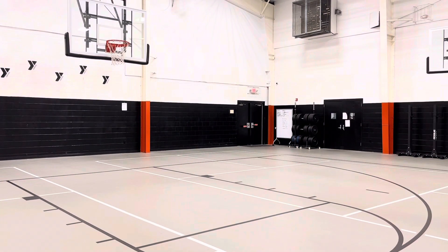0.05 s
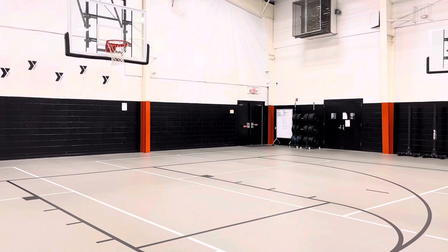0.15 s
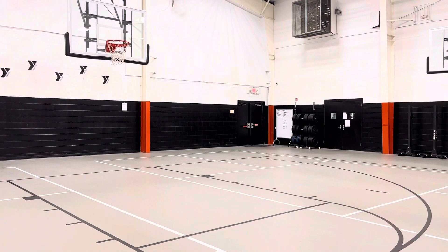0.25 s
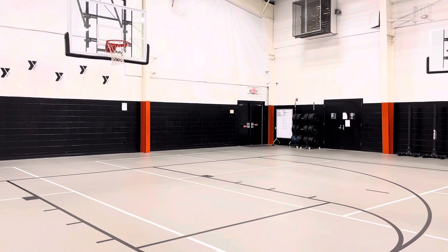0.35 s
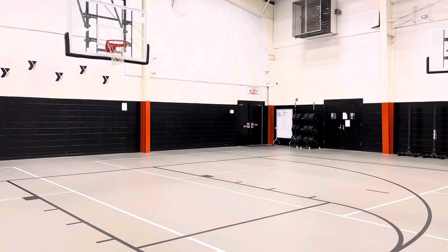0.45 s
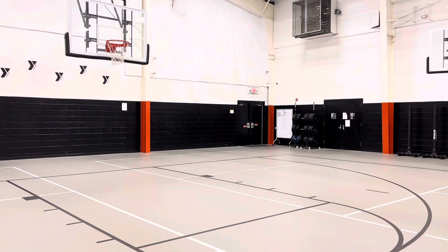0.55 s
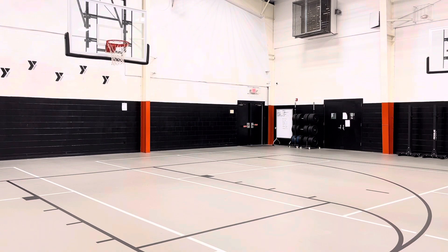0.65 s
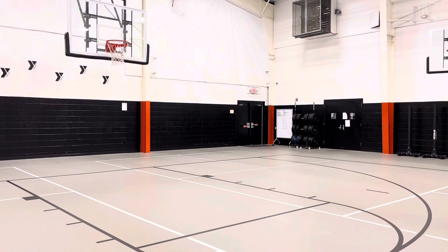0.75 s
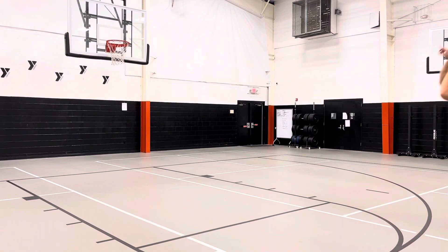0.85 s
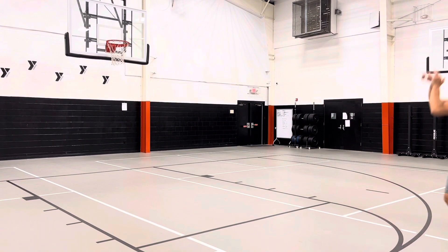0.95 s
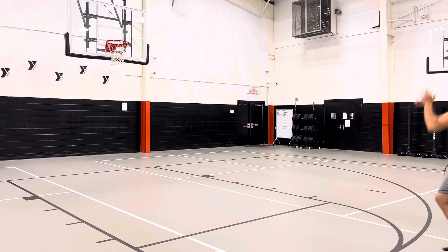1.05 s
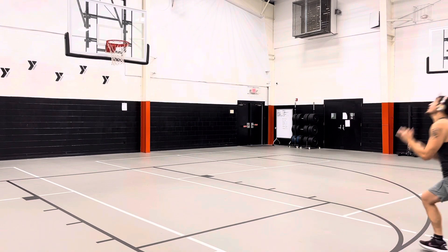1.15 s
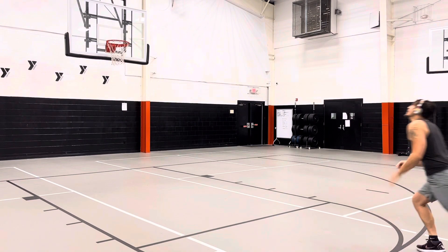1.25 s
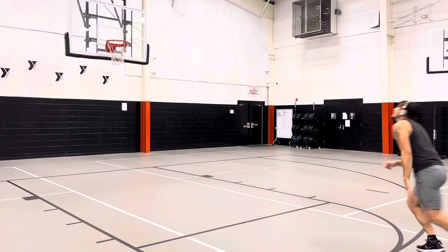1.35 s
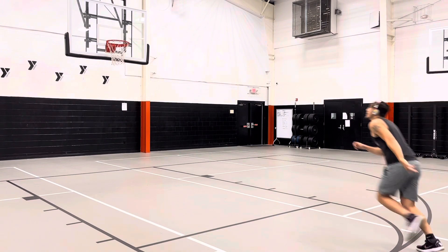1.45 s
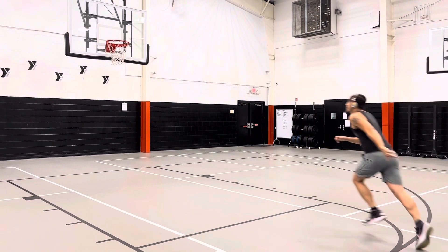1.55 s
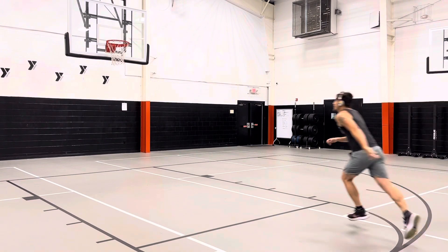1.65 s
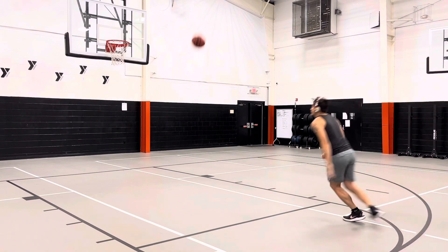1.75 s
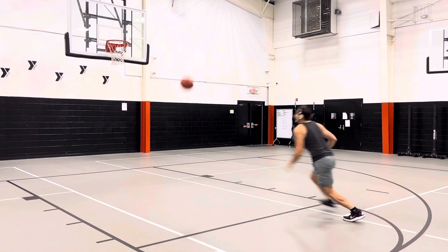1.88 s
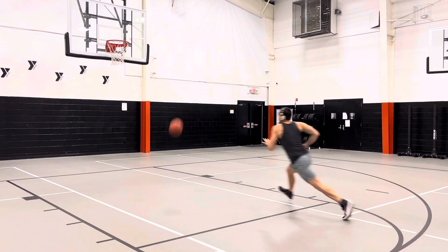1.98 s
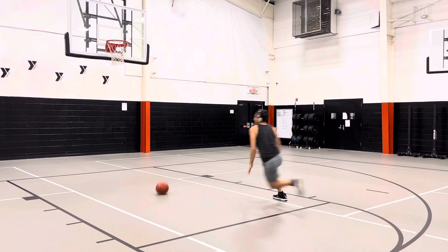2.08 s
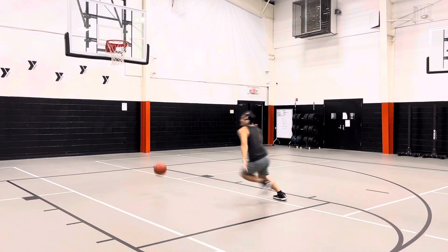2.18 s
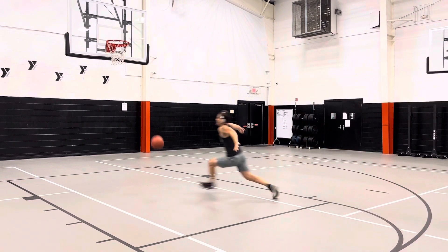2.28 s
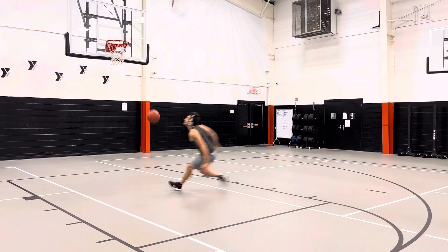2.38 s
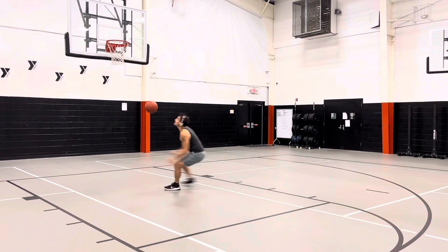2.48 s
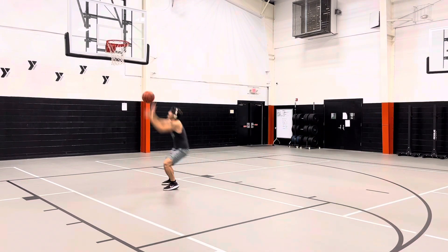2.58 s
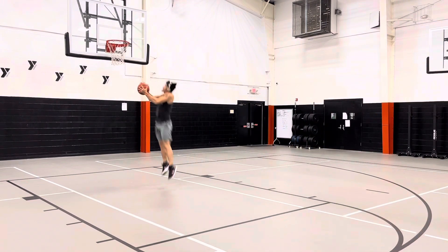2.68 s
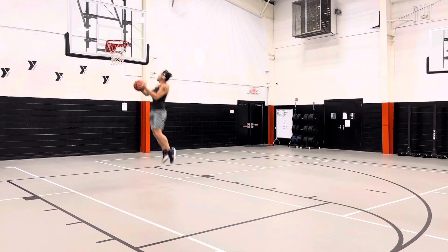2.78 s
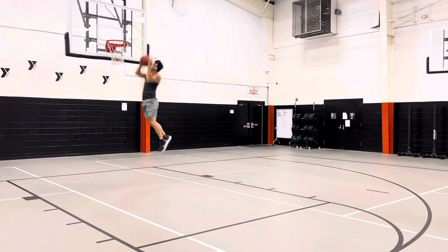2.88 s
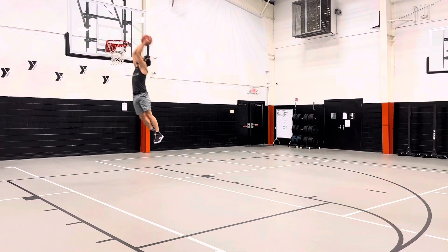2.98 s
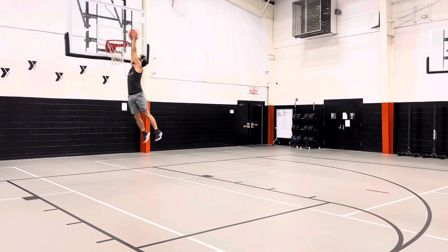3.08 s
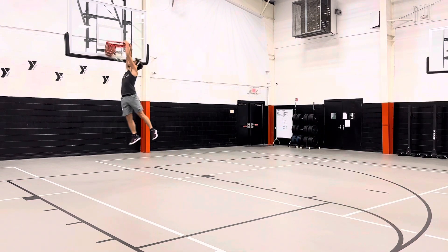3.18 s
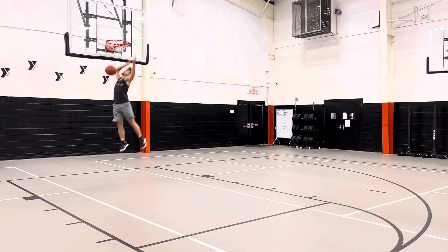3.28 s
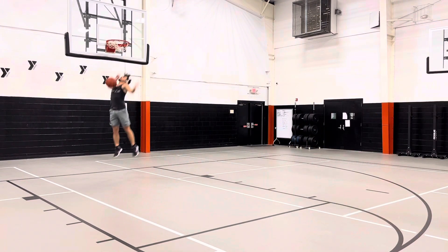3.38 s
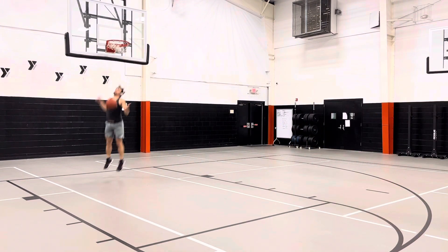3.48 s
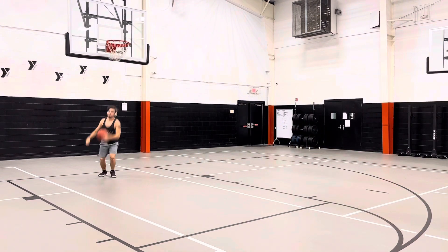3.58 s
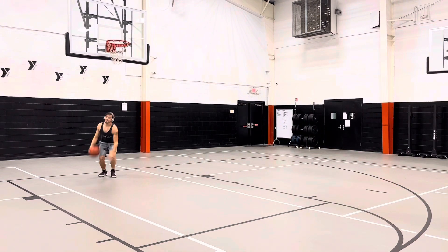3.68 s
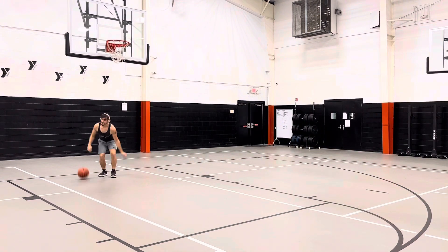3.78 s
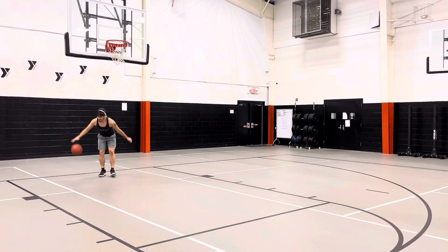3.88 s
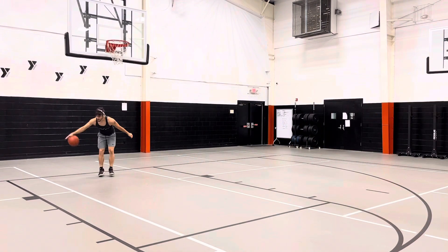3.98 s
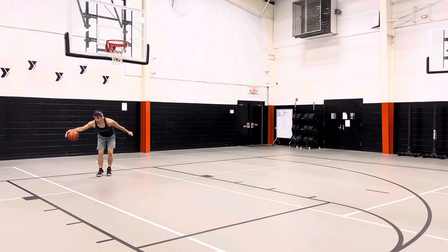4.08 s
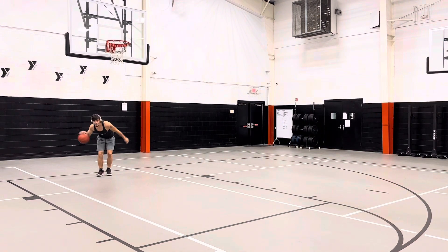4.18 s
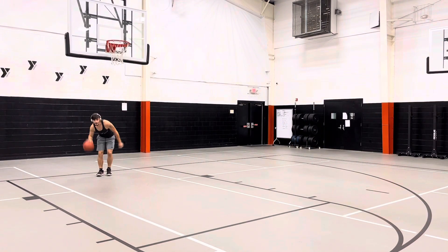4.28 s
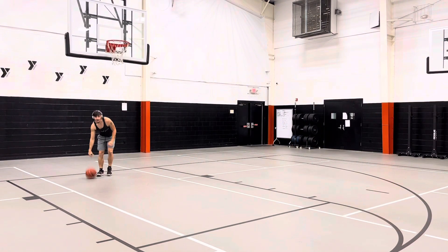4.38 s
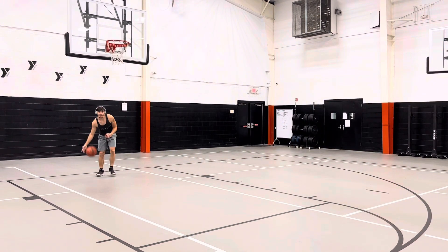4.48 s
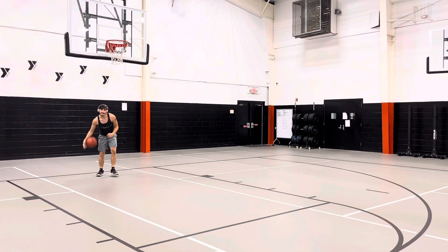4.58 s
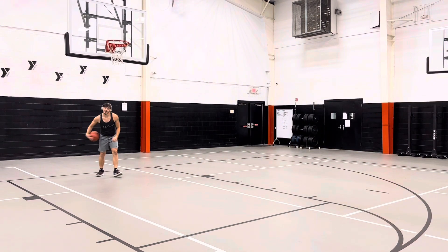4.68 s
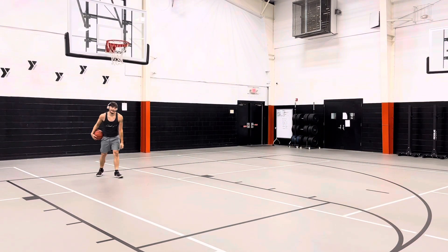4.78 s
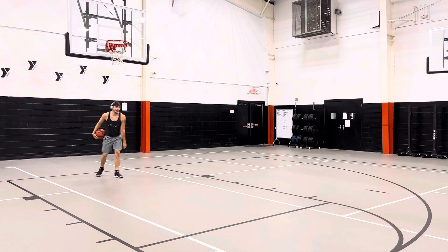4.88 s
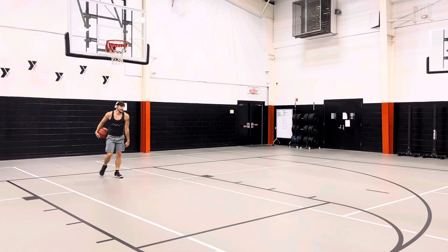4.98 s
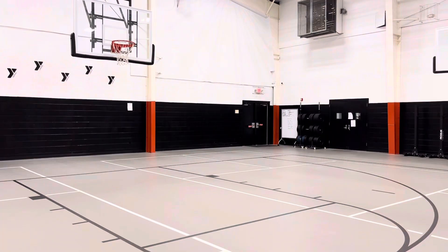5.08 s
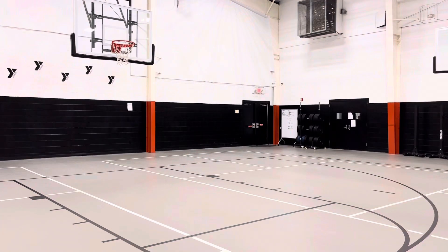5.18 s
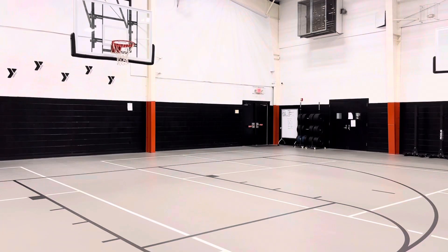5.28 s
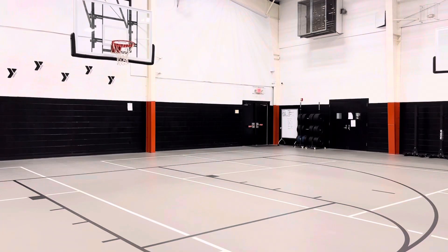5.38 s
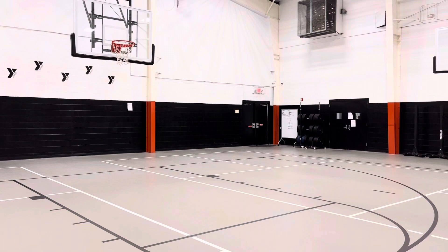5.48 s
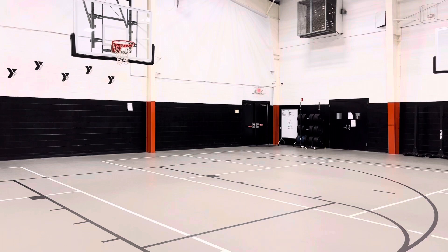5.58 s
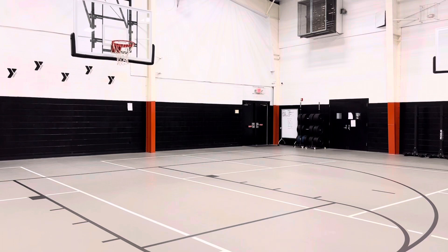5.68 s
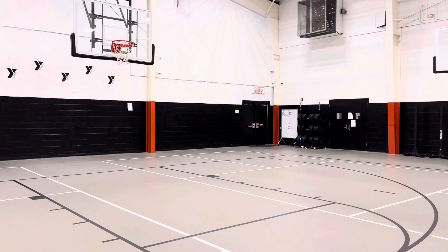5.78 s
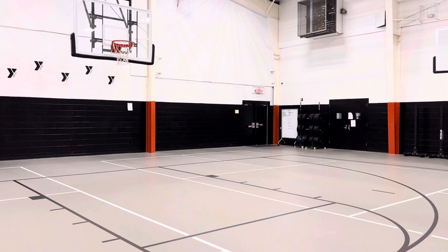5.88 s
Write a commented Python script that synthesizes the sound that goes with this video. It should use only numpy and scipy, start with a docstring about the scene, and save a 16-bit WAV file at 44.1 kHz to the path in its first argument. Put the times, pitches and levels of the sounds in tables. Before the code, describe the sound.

A large, hard-walled gym heard from a fixed stereo microphone. Low ventilation rumble and thin air run throughout; at first the ring of an earlier bounce is dying away. Soft running footfalls come at about 0.05, 0.64, 1.0, 1.3, 1.75 and 2.05 seconds, some toward the left. At 2.14 a basketball hits the floor very loudly: sharp slap, hollow ringing shell, deep falling thump, quick fluttering echoes and a long bright reverberation. Around 2.55-2.62 a high shoe squeak chirps twice. From 3.17 to 3.35 a dunk gives a dull hoop thud, then clacks and loose metallic rattling. Feet land with a heavy double thump at 3.55. Softer dribbles sound at 3.80 and 4.42, with a tiny rubber chirp at 4.1. At 5.04 the echo stops abruptly, leaving quiet rumble, barely audible swishes, and a fresh footstep at 5.83.

```python
"""Empty gym: a player runs in, lets the ball bounce, jumps and dunks, lands, dribbles twice and steps on.
Ball, shoes, hoop and backboard are struck ringing modes; the floor gives falling thumps, the soles
stick-slip squeaks. Blows ring on through decaying noise bands, until the ringing stops short.
Ventilation rumble, air, faint swishes and the fading ring of an earlier bounce are shaped noise."""
import sys
import numpy as np
from scipy import signal
from scipy.io import wavfile

SR = 44100
rng = np.random.default_rng(int(sys.argv[2]) if len(sys.argv) > 2 else 0)


def store_pcm(level_fs):
    """Save levels as 16-bit WAV."""
    pcm = np.round(np.clip(level_fs, -1, 1) * 32767).astype(np.int16)
    wavfile.write(sys.argv[1], SR, np.atleast_2d(pcm).T)


N = 262262


def amp(db):
    """dB to gain."""
    return 10 ** (np.asarray(db) / 20)


def rms_one(x):
    """Scale to rms 1."""
    return x / np.sqrt(np.mean(x ** 2) + 1e-20)


def cut(x, order, edge_hz, kind="low"):
    """Butterworth filter along time."""
    return signal.sosfilt(signal.butter(order, edge_hz, kind, fs=SR, output="sos"), x)


def at_hz(points, hz):
    """Read a spectrum table on a log-frequency axis."""
    table_hz, table_value = np.transpose(points)
    return np.interp(np.log(hz), np.log(table_hz), table_value)


def drift(rate_hz, size):
    """Slow random wander of spread 1: noise through a two-pole lowpass, computed every 40 samples."""
    r = np.exp(-80 * np.pi * rate_hz / SR)
    noise = rng.standard_normal(size // 40 + 2002)
    slow = signal.lfilter([1], [1, -2 * r, r * r], noise)[2000:]  # settled part
    return np.interp(np.arange(size) / 40, np.arange(len(slow)), rms_one(slow))


def ring(clicks, hz, t60_s):
    """Damped resonator: a unit click sets a sine of height 1 ringing."""
    r, w = amp(-60 / (t60_s * SR)), 2 * np.pi * hz / SR
    return signal.lfilter([0, np.sin(w)], [1, -2 * r * np.cos(w), r * r], clicks + 1e-18)


def left_right(mid, side):
    """Mid and side to two channels."""
    return np.array([mid + side, mid - side])


PAN_TOP_HZ = 7500  # level panning fades out above


def add(track, sound, start_s, lead=0., pan_db=0.):
    """Mix in a short sound; lead (samples) and pan_db (L-R) set its side by arrival time and level."""
    k, i = np.arange(len(sound)), int(start_s * SR)
    lowpass = signal.butter(2, PAN_TOP_HZ, fs=SR)
    for channel, sign in enumerate([1, -1]):
        late = np.interp(k - max(-sign * lead, 0), k, sound, left=0)
        panned = (amp(sign * pan_db / 2) - 1) * signal.lfilter(*lowpass, late)
        track[channel, i:i + len(k)] += (late + panned)[:N - i]


# side minus mid of diffuse sound: hz, side_re_mid_db
WIDTH = [(60, -34), (110, -18), (200, -10), (380, -3.5), (700, 2), (1290, 3.5), (2380, -5), (4400, -1.5),
         (8120, 0.5), (15000, -3)]
# left port hears more of the presence range: hz, left_re_right_db
LEAN = [(60, -1), (180, -1), (550, 1), (1650, -0.5), (4970, 6.5), (15000, -4.5)]
DIFFUSE_TOP_HZ, SIDE_TOP_HZ = 14200, 10500


def diffuse_bands(size, gain_at):
    """Far sound: half-octave bands of mid and side noise, each under gain_at(hz), with their top cut."""
    out, edges_hz = 0, 25 * 2 ** np.arange(0, 9.6, .5)
    white = cut(rng.standard_normal((2, 2, size)), 8, DIFFUSE_TOP_HZ)
    white[:, 1] = cut(white[:, 1], 6, SIDE_TOP_HZ)
    for k, (low_hz, high_hz) in enumerate(zip(edges_hz, edges_hz[1:])):
        mid, side = cut(white[k % 2], 2, [low_hz, high_hz], "band")  # neighbours use different noise
        hz = np.sqrt(low_hz * high_hz)
        lean = amp(at_hz(LEAN, hz) / 2 * np.array([[1], [-1]]))
        out = out + gain_at(hz) * lean * left_right(mid, side * amp(at_hz(WIDTH, hz)))
    return out


# ventilation spectrum, shape only: hz, relative_db_per_hz
RUMBLE = [(15, -59), (25, -63), (41, -18.5),(64, 4), (112, -11.5), (139, -14), (246, -21.5), (400, -30.5),
          (520, -63), (880, -93)]
# low rumble level, at first with the dying bass of an earlier bounce: time_s, level_db
RUMBLE_LEVEL = [(0, -33), (.9, -39.5), (1.05, -35.5), (2.1, -39.5), (5.5, -36.5), (5.95, -40.5)]
# air spectrum, shape only: hz, relative_db_per_hz
AIR = [(120, -9), (200, -4.5), (326, -6.5), (946, -10.5), (5170, -22), (7280, -78), (8410, -65),
       (9380, -35), (12700, -33), (15000, -94)]
AIR_DB, EARLIER_RING_DB, EARLIER_RING_T60_S = -54, -47.5, 3.7
EARLIER_RING_HZ, EARLIER_RING_WIDTH_HZ, EARLIER_PEAK_DB = 1030, 350, 2.5  # colour of the ball's shell


def room_tone():
    """Low rumble, at first fading with an earlier bounce, a steady wash of air, and that bounce's ring."""
    t = np.arange(N) / SR
    rumble = rms_one(diffuse_bands(N, lambda hz: amp(at_hz(RUMBLE, hz))))
    rumble = rumble * amp(0.5 * drift(0.69, N))
    rumble = rumble * amp(np.interp(t, *np.transpose(RUMBLE_LEVEL)))
    air = rms_one(diffuse_bands(N, lambda hz: amp(at_hz(AIR, hz))))
    reversed_air = air[:, ::-1]  # same spectrum, other waveform
    peak = signal.iirpeak(EARLIER_RING_HZ, EARLIER_RING_HZ / EARLIER_RING_WIDTH_HZ, SR)
    earlier = reversed_air + amp(EARLIER_PEAK_DB) * signal.lfilter(*peak, reversed_air)
    earlier = earlier * amp(EARLIER_RING_DB - 60 * t / EARLIER_RING_T60_S)
    return rumble + air * amp(AIR_DB) + earlier


# clothes and soles in the highest treble: start_s, length_s, relative_db
SWISHES = [(0.022, 0.087, -74.5), (1.26, 0.03, -78), (1.998, 0.023, -72.5), (5.313, 0.046, -79),
           (5.585, 0.041, -83)]


def swishes():
    """Soft swells of thin noise, quick to rise and slower to fade."""
    t, swell = np.arange(N) / SR, np.zeros(N)
    for start_s, length_s, relative_db in SWISHES:
        u = np.clip((t - start_s) / length_s, 0, None)
        swell += amp(relative_db) * 9.3 * u * np.exp(1 - 2.35 * u)
    return swell * rms_one(cut(rng.standard_normal(N), 4, [9500, 14000], "band"))


def tick(centre_hz, t60_s=.0045, front=4):
    """Decaying noise burst around one pitch; peak 1."""
    t = np.arange(int(1.5 * t60_s * SR)) / SR
    burst = rng.standard_normal(len(t)) * amp(-60 * t / t60_s)
    burst[0] = front  # first sample set, not random
    burst = cut(burst, 2, [centre_hz / 1.7, centre_hz * 1.7], "band")
    return burst / np.abs(burst).max()


def thump(low_hz=56, sweep=0.715, rise_s=0.0082, t60_s=0.15):
    """Bending waves in the floor: high pitches run ahead, so the tone falls towards low_hz."""
    t = np.arange(8000) / SR
    phase = 2 * np.pi * (low_hz * t + sweep * np.log(1 + t / .003))
    return np.sin(phase) * (1 - np.exp(-(t / rise_s) ** 2)) * amp(-60 * t / t60_s)


# shoes on the floor: start_s, tap_db, knock_db, knock_hz, thump_db, left_re_right_db
STEPS = [(.052, -35, -30.5, 544, -25.5, -3), (0.637, -45, -39, 390, -58, 8),
         (.645, -35.5, -32.5, 376, -26, 2), (1.022, -42, -36, 300, -31.5, 4),
         (1.2650, -30, -37.5, 850, -60, 9.5), (1.7440, -49, -33, 905, -25.5, -2),
         (2.05, -48, -34, 507, -29, -1), (3.544, -36, -41, 400, -14.5, 1),
         (3.575, -21.5, -21, 200.5, -21, 1), (5.8320, -28, -25, 334, -23.5, 5.5),
         (5.85, -30.5, -35, 520, -45, 8)]
# sole: multiple_of_knock_hz, re_knock_db, t60_s
SOLE_MODES = [(.5, 0, 0.0089), (1, -3, 0.02), (1.5, -0.5, 0.0032)]
TAP_HZ, STEP_SEND_DB = 3500, 1.5


def steps():
    """Tread tap, sole knock and short floor thump; returns the direct sound and the hall feed."""
    direct, feed = np.zeros((2, N)), np.zeros((2, N))
    for start_s, tap_db, knock_db, knock_hz, thump_db, pan_db in STEPS:
        sound = amp(thump_db) * thump(low_hz=66.3, sweep=1.0, rise_s=0.0044, t60_s=0.072)
        click = np.arange(len(sound)) == 70
        for multiple, db, t60_s in SOLE_MODES:
            sound += amp(knock_db + db) * ring(click, knock_hz * multiple, t60_s)
        tap = amp(tap_db) * tick(TAP_HZ, .004, 6)
        sound[:len(tap)] += tap
        add(direct, sound, start_s, 0., pan_db)
        add(feed, amp(STEP_SEND_DB) * sound, start_s)
    return direct, feed[0]


# late decay: hz, t60_s
HALL_T60 = [(40, 1.15), (120, 4.6), (350, 3.56), (900, 2.55), (2400, 2.68), (5000, 3.14), (7500, 1.7),
            (10600, 1.33), (13000, 0.71)]
# reverberation spectrum: hz, relative_db
HALL_COLOUR = [(30, 6.5), (80, -7.5), (200, -4), (500, -6.5), (1200, -8), (2500, -0.5), (5000, -2),
               (9000, 2), (14000, -14.5)]


def hall(feed, level_db=-36, early_db=21.0, early_t60_s=0.15):
    """Reverberation: reflections thicken, an early boost dies fast, each band decays at its own rate."""
    t = np.arange(3 * SR) / SR
    tail = diffuse_bands(len(t), lambda hz: amp(at_hz(HALL_COLOUR, hz) - 60 * t / at_hz(HALL_T60, hz)))
    tail *= 1 - np.exp(-(t / .052) ** 2)
    tail *= 1 + amp(early_db - 60 * t / early_t60_s)
    return amp(level_db) * signal.fftconvolve(feed[None], tail, axes=1)[:, :N]


# air squeezed out at contact: hz, relative_db, t60_s
SLAP_MODES = [(2100, 1, .002), (3400, -2, .001), (5500, -4, .001), (11000, -3, .0008)]


def slap(thin_hz=700, dull_hz=15000):
    """Millisecond puff of air squeezed out at contact: a spike rings short modes; peak 1."""
    spike = np.zeros(600)
    spike[:5] = [-1, 0, 0, 0, 0] + .15 * rng.standard_normal(5)
    burst = sum(amp(db) * ring(spike, hz, t60_s) for hz, db, t60_s in SLAP_MODES)
    burst = cut(burst, 2, [thin_hz, dull_hz], "band")
    return burst / np.abs(burst).max()


# ball on the floor: start_s, slap_db, shell_db, thump_db, thump_send_db, left_lead_samples,
# left_re_right_db, echoes_db, end_wall_delay_s, first_flutter_db, loss_per_flutter_db, slap_send_db
BOUNCES = [(2.1440, 2, -14.5, -1.5, 4, 2.64, 0.82, -6.5, .0420, 1, 9, 3.5),
           (3.8036, -9.5, -19, -9.5, 1, 3.7, 5.7, -15.5, .0284, -4, 4, 5.5),
           (4.4220, -13, -19, -6.5, 2, 3.0, 2.6, -17, .0280, -2, 1.5, 8.5)]
# ball shell: hz, relative_db, t60_s
BALL_MODES = [(233.4, 6, 0.011), (382, -0.5, 0.031), (482, -10.5, 0.0055), (732, -22, 0.07),
              (918, 3.5, 0.02), (1005, -6, 0.077), (1091, -15.5, 0.11), (827, -13, 0.042)]
# returns common to all bounces: delay_s, re_echoes_db, centre_hz
ECHOES = [(.0180, -3, 4500), (.048, -8, 4500), (.061, -8, 3000), (.090, -6, 4500)]
END_WALL_DB, END_WALL_HZ = 0, 5000  # its delay depends on where the ball lands
SHELL_SEND_DB = 9.5
SHELL_LAG_CYCLES = 0.732  # onset of each mode in its own cycles: lows come later
THUMP_LAG_S = .002
CRACKLE_DB, CRACKLE_HZ = -12, 6500  # pebbled skin at contact
FLUTTER_S, FLUTTER_ODD_DB = .0142, 1.5  # spacing of the shell's returns, spread of their levels


def bounce(row, odd_db):
    """Slap, ringing shell, late floor thump, echoes, and a freshly drawn reverberation tail."""
    (start_s, slap_db, shell_db, thump_db, thump_send_db, lead, pan_db,
     echo_db, wall_s, flutter_db, loss_db, slap_send_db) = row
    low = np.pad(thump(), (int(THUMP_LAG_S * SR), 0))
    k, shell = np.arange(len(low)), 0
    for (hz, db, t60_s), mode_odd_db in zip(BALL_MODES, odd_db):
        click = k == int(SHELL_LAG_CYCLES * SR / hz)
        shell = shell + amp(db + mode_odd_db) * ring(click, hz, t60_s)
    puff = np.pad(slap(), (0, len(low) - 600))
    parts = np.array([puff, shell, low]) * amp([slap_db, shell_db, thump_db])[:, None]

    direct, feed = np.zeros((2, N)), np.zeros((2, N))
    add(direct, parts.sum(0), start_s, lead, pan_db)
    add(direct, amp(CRACKLE_DB) * tick(CRACKLE_HZ), start_s, lead, pan_db)
    for delay_s, db, centre_hz in list(ECHOES) + [(wall_s, END_WALL_DB, END_WALL_HZ)]:
        echo_lead = rng.uniform(-1.5, 1.5)
        add(direct, amp(echo_db + db) * tick(centre_hz), start_s + delay_s, echo_lead, pan_db / 2)
    for turn, (odd_level, odd_lead) in enumerate(rng.normal(0, 1, (6, 2))):
        gain = amp(flutter_db - loss_db * turn + FLUTTER_ODD_DB * odd_level)
        add(direct, gain * parts[1], start_s + FLUTTER_S * (turn + 1), odd_lead, pan_db / 2)
    add(feed, amp([slap_send_db, SHELL_SEND_DB, thump_send_db]) @ parts, start_s)
    return direct + hall(feed[0])


# slipping sole: start_s, length_s, pitch_hz, end_db, swell_db, sag_share, second_db, third_db,
# left_re_right_db, sharp_start_share, wobble_share
SQUEAKS = [(2.556, .048, 5320, -34, 16, .01, 6, -40, -2.0, 0, .013),
           (2.609, .012, 5310, -25.5, 6, .015, 6, -40, -2.0, .03, .009),
           (4.0965, .002, 4550, -41, -5, .03, -10, -8, 8.0, .03, .015),
           (4.0993, .005, 4000, -32, -7, .11, 0, 3, 8.0, .01, .01),
           (4.110, .019, 4040, -27.5, 6, .085, -10, -2, 8.0, 0, .017)]
GRIP_S, LET_GO_S = .002, .008  # sharp start settles; sole lets go
LET_GO_DB, LET_GO_THIRD_DB = 5, 14  # fade while letting go; top overtone goes first


def squeaks(rough_db=3.5):
    """Stick-slip of rubber: a wavering tone with two overtones."""
    out = np.zeros((2, N))
    for (start_s, length_s, hz, end_db, swell_db, sag, second_db, third_db,
         pan_db, sharp, wobble) in SQUEAKS:
        t = np.arange(0, length_s + LET_GO_S, 1 / SR)
        letting_go = np.clip((t - length_s) / LET_GO_S, 0, 1)
        bend = 1 + sharp * np.exp(-t / GRIP_S) - sag * np.minimum(2 * letting_go, 1)
        bend += wobble * drift(350, len(t))
        phase = 2 * np.pi * np.cumsum(hz * bend) / SR
        tone = np.sin(phase) + amp(second_db) * np.sin(2 * phase)
        tone += amp(third_db - LET_GO_THIRD_DB * np.sqrt(letting_go)) * np.sin(3 * phase)
        level_db = end_db - swell_db * np.clip(1 - t / length_s, 0, 1) - LET_GO_DB * letting_go ** 2
        level_db = level_db + rough_db * drift(320, len(t))
        add(out, tone * np.minimum(t / GRIP_S, 1) * amp(level_db), start_s, 2.0, pan_db)
    return out


# blows of the dunk: start_s, relative_db, hardness_hz, clack_db
HOOP_BLOWS = [(3.172, -23, 151, -60), (3.185, -33, 900, -35), (3.205, -27, 405, -45),
              (3.269, -34, 2600, -18.5), (3.289, -32.5, 2580, -24.5), (3.310, -30.5, 2080, -46),
              (3.338, -28.5, 1800, -40)]
RATTLE_DB, RATTLE_T60_S, RATTLE_HARD_HZ = -11, 0.24, 1874  # hardness of unit gain


def rattle_level(t):
    """Gain of the loose shaking: dying remains of all blows so far, more from hard ones."""
    start_s, db, hardness_hz, _ = np.transpose(HOOP_BLOWS)[:, :, None]
    decay = amp(db + RATTLE_DB - 60 * (t - start_s) / RATTLE_T60_S)
    remains = (t > start_s) * decay * hardness_hz / RATTLE_HARD_HZ
    return np.sqrt((remains ** 2).sum(0))


# hoop and backboard: hz (nominal), relative_db, t60_s
HOOP_MODES = [(91, 8, 0.06), (123.3, -5.5, 0.51), (173.2, 3, 0.11), (231.8, -4.5, 0.15), (288, -0.5, 0.045),
              (380, 4, 0.053), (437, 1, 0.075), (552, -6, 0.04), (613, -5, 0.093), (750, -5, 0.08),
              (850, 13, 0.0099), (960, -0.5, 0.028), (1183, 5, 0.029), (1410, -4.5, 0.035),
              (1750, -0.5, 0.013), (2150, -6.5, 0.011), (2600, -19, 0.012)]
CLACK_HZ, CLACK_T60_S = 3000, .016  # ball and hands scrape the ring
CLACK_EDGE_HZ, CLACK_EDGE_DB = 9000, 0


def hoop(rattles_per_s=1100):
    """Blows and loose rattling ring the hoop's modes; a soft contact is a dull click."""
    first_s = HOOP_BLOWS[0][0]
    t = np.arange(SR) / SR + first_s
    hits = rng.random(SR) < rattles_per_s / SR
    strength = amp(3.5 * np.minimum(rng.exponential(1, SR), 3.5))
    loose = hits * strength * rattle_level(t)
    contact = signal.lfilter([.3], [1, -.7], loose * rng.choice([-1, 1], SR))
    sound = sum(amp(db) * ring(contact, hz, t60_s) for hz, db, t60_s in HOOP_MODES)
    # bolts and net hooks tick
    sound += amp(23.0) * cut(loose * rng.choice([-1, 1], SR), 2, [2000, 10000], "band")

    out = np.zeros((2, N))
    for start_s, level_db, hardness_hz, clack_db in HOOP_BLOWS:
        r = np.exp(-2 * np.pi * hardness_hz / SR)
        click = np.arange(SR) == int((start_s - first_s) * SR)
        hit = amp(level_db + 3.0) * signal.lfilter([(1 - r) ** 2], [1, -2 * r, r * r], click)
        for hz, db, t60_s in HOOP_MODES:
            strength = amp(db + rng.normal(0, 3)) * rng.choice([-1, 1])
            sound += strength * ring(hit, hz * rng.normal(1, .03), t60_s)
        clack = tick(CLACK_HZ, CLACK_T60_S, 0)
        clack = clack + amp(CLACK_EDGE_DB) * tick(CLACK_EDGE_HZ, CLACK_T60_S, 0)
        add(out, amp(clack_db) * clack, start_s, lead=2.0, pan_db=4.0)
    add(out, sound, first_s, lead=3.4, pan_db=4.0)
    return out


RINGING_ENDS_S = 5.042


def scene():
    """Sum of all sources; what rings is cut off at one instant, a later step rings anew."""
    odd = rng.normal(0, 1.5, (len(BOUNCES), len(BALL_MODES)))  # dB per bounce and mode
    ball = sum(bounce(row, odd_db) for row, odd_db in zip(BOUNCES, odd))
    feet, feet_feed = steps()
    dunk, rubber = hoop(), squeaks()
    before = np.clip((RINGING_ENDS_S - np.arange(N) / SR) / .002, 0, 1)
    other_feed = amp(3.0) * dunk.mean(0) + amp(1.0) * rubber.mean(0) + feet_feed * before
    ringing = before * (ball + hall(other_feed) + dunk)
    late_ringing = hall(feet_feed * (1 - before))
    return feet + rubber + ringing + late_ringing + room_tone() + swishes()


LOW_CUT_HZ, CUTOFF_HZ = 43, 16500
PORT_NOTCH_HZ, PORT_NOTCH_WIDTH_HZ = 8500, 1700


def record(dry):
    """The two ports cancel near one treble pitch in their sum; bass and top are cut, peaks rounded."""
    dry = cut(dry, 4, LOW_CUT_HZ, "high")
    mid, side = (dry[0] + dry[1]) / 2, (dry[0] - dry[1]) / 2
    notch = signal.iirnotch(PORT_NOTCH_HZ, PORT_NOTCH_HZ / PORT_NOTCH_WIDTH_HZ, SR)
    mid = signal.lfilter(*notch, signal.lfilter(*notch, mid))
    rounded = .9 * np.tanh(left_right(mid, side) / .9)
    return signal.sosfilt(signal.cheby2(12, 70, CUTOFF_HZ, fs=SR, output="sos"), rounded)


dry = scene()
out = record(dry)
store_pcm(out)
```